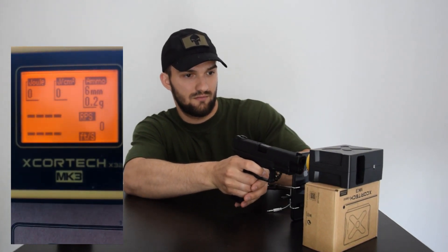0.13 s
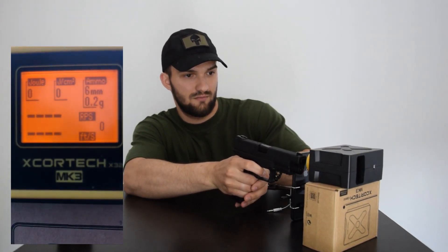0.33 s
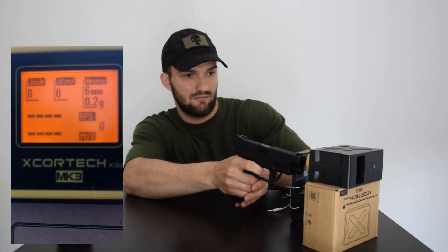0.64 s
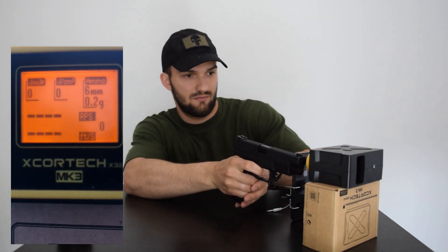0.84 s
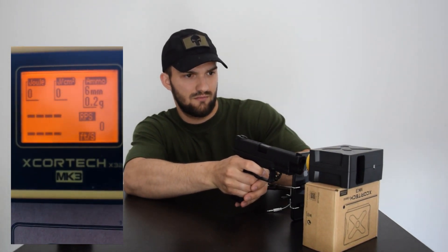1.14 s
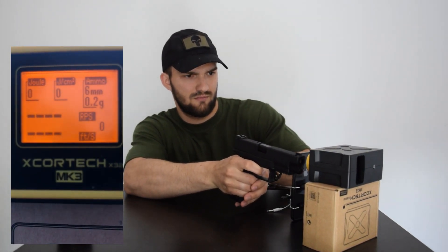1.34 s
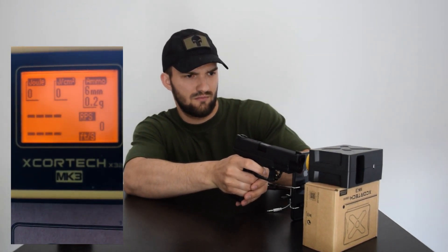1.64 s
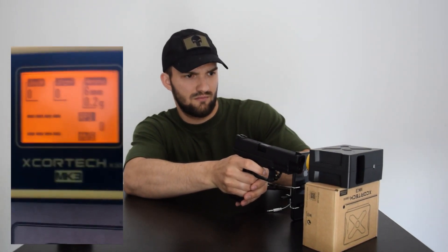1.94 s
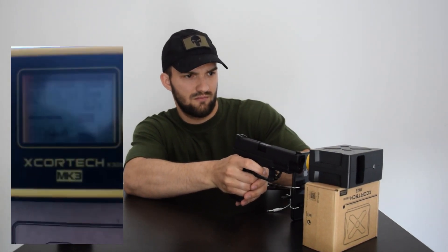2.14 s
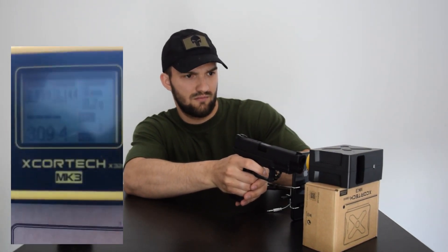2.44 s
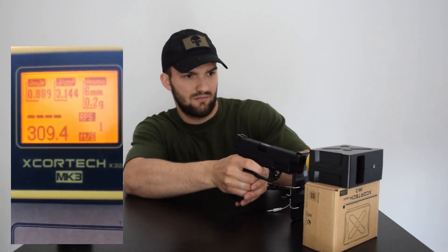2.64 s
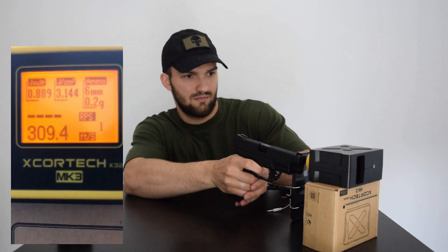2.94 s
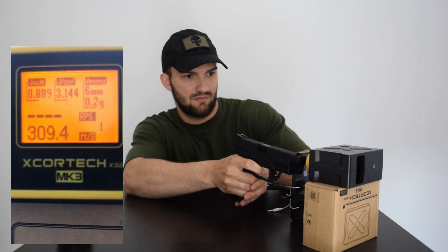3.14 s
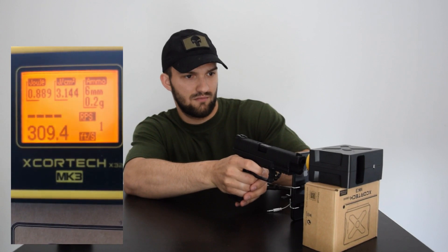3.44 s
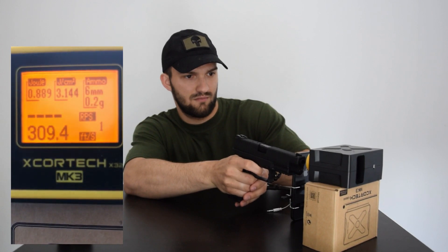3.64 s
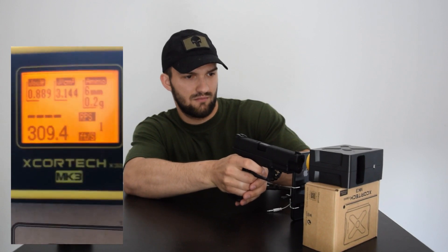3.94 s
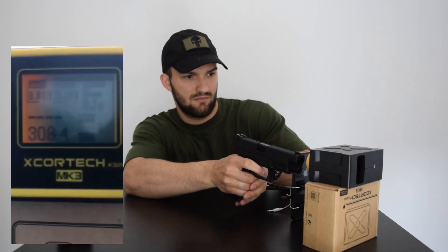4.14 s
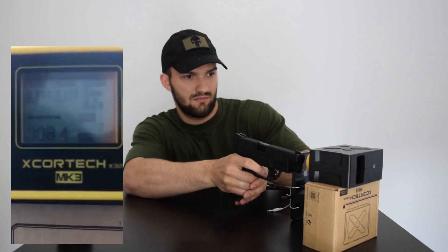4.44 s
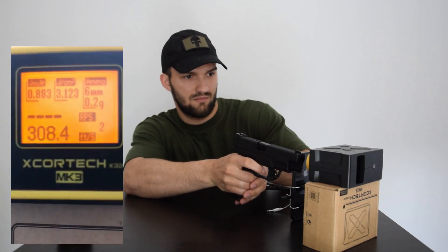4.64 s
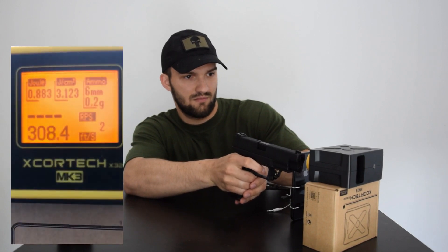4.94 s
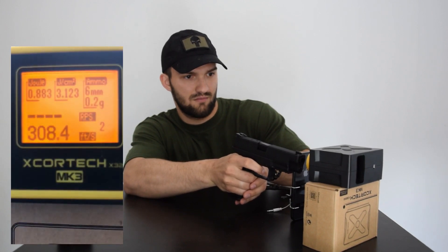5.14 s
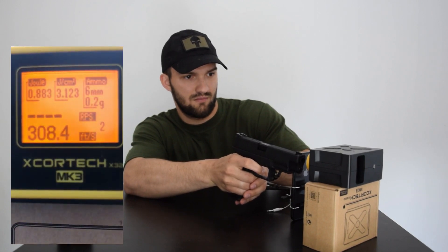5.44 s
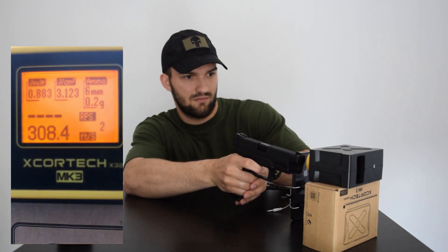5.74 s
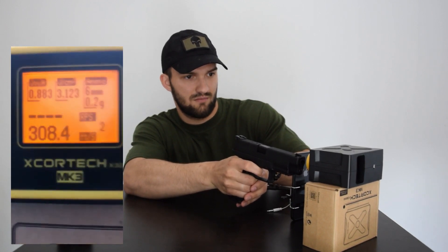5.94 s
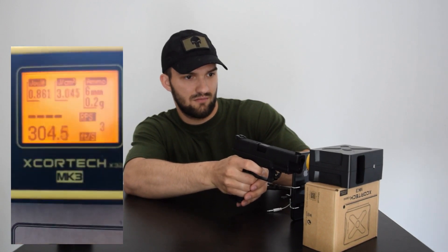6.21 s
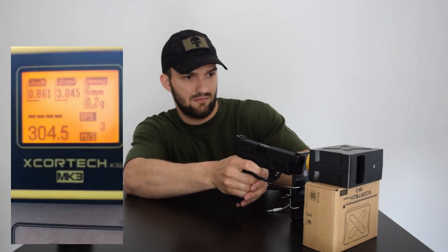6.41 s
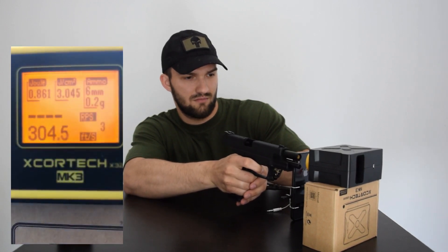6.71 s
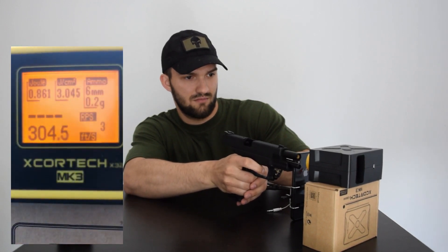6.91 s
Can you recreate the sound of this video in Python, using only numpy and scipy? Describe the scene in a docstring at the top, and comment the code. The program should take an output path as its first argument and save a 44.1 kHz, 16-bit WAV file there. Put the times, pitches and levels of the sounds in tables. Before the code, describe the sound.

A gas-powered pellet pistol fires three single loud snaps, slide clattering, room ringing briefly, with faint hiss and soft rumble between shots.

```python
"""A gas blowback airsoft pistol fires three shots through a chronograph on a table in a small, bare room.
Each shot is a hammer tick, a pressure pulse, a jet of gas and the clack of the slide, built from shaped noise,
clicks and decaying sines. The room answers with echoes, a dense tail and standing waves for most of a second.
The close microphone overloads on the loud onsets. Soft rumble, a faint hiss and a trace of whine fill the pauses."""
import sys
import numpy as np
from scipy import signal
from scipy.fft import rfft, irfft
from scipy.io import wavfile

SR = 44100
rng = np.random.default_rng(int(sys.argv[2]) if len(sys.argv) > 2 else 0)


def put_to_file(sound):
    """Save the sound as 16-bit audio at rate SR, in the file named by the first command-line argument."""
    columns = np.atleast_2d(sound).T  # one column per channel
    safe = np.clip(columns, -1, 1)
    whole_steps = np.round(safe * 32767)
    wavfile.write(sys.argv[1], SR, whole_steps.astype(np.int16))


N = 311787

# Room air at the microphone, spectral shape: (frequency [Hz], level [dB])
AIR_SPECTRUM = [(20, -8.5), (50, 0), (160, -1.5), (215, 4), (255, 2), (300, -3.5), (600, -6.5), (1100, -10),
                (1800, -14), (3300, -19), (5000, -20), (7000, -22), (8000, -27.5), (15500, -38)]
# Narrow resonances of the hiss: (centre [Hz], half-width at half gain [Hz], level [dB])
HISS_RESONANCES = [(1480, 110, -15), (2201, 180, -11.5), (2610, 90, -12.5), (2860, 150, -10.5),
                   (3520, 110, -14), (3790, 110, 0.5), (3920, 48, 0), (4050, 30, -1), (4332, 75, -3),
                   (4500, 100, -13), (5350, 150, -20), (5970, 110, -13.5), (6280, 170, -16),
                   (6960, 220, -16.5)]
AIR_DB, HISS_DB, WHINE_DB = -59.5, -59.5, -89
WHINE_HZ = 15682

# Shots: (time [s], pressure pulse level [dB], gas jet level [dB], slide level [dB],
# late clack time after the shot [s], late clack level [dB])
SHOTS = [(1.3730, -0.5, -2, -0.5, 0.11, -2.5), (3.7940, -1, 0.2, -1.5, 0.14, -3.5),
         (6.6084, -2.5, -2, -6, .136, -1)]
# Blows of the action, hammer, slide at its rear stop, slide home: (time after hammer fall [s], level [dB])
ACTION_BLOWS = [(0, -15), (.016, -1), (.058, -3)]
HAMMER_LEAD_S, BARREL_S = 0.0016, 0.003  # hammer falls before the gas; pellet's time in the barrel
# Metal-on-metal crack, spectral shape: (frequency [Hz], level [dB])
CLACK_SPECTRUM = [(100, -18), (400, -4.5), (1300, -2), (2000, -6), (3000, -2.5), (3800, -7), (6300, 3.5),
                  (7300, -4), (9000, -16), (15500, -36)]
# Ringing of slide and frame: (frequency [Hz], level [dB], 60 dB decay time [s])
GUN_MODES = [(1184, -5.5, 0.059), (1346, -1.5, 0.064), (2260, -8, .06), (2705, -1.5, 0.088),
             (2924, -3, 0.047), (3140, -2, 0.029), (4470, -5.5, 0.057), (5560, -5, .04), (6300, -2.5, .025),
             (6450, -4.5, .02)]
# Escaping gas, spectral shape: (frequency [Hz], level [dB])
JET_SPECTRUM = [(200, -25), (1000, -12.5), (2100, -12.5), (3100, -4.5), (3600, -10), (4500, -6), (5400, -4),
                (6400, -1.5), (7200, -4), (8200, -13.5), (10000, -22), (15500, -38)]
# Bright snap at the muzzle, spectral shape: (frequency [Hz], level [dB])
SNAP_SPECTRUM = [(1000, -14), (4000, -8), (6500, 0), (8500, -4), (12000, -3.5), (16000, -7)]
# Pressure pulse at the muzzle, spectral shape: (frequency [Hz], level [dB])
PULSE_SPECTRUM = [(30, -28), (90, -18), (190, -1.5), (235, -5), (300, 3), (440, 2.5), (530, -1),
                  (800, -1.5), (1300, -1), (1750, -7), (3000, -5.5), (4000, -11.5), (7000, -14),
                  (15000, -36)]

# Standing waves of the room: (frequency [Hz], level [dB], 60 dB decay time [s])
ROOM_MODES = [(165, -9, .6), (196.6, 2.5, .45), (306, 1, 0.42), (376, -2.5, .5), (419, -1, 0.7),
              (448.5, -3.5, 0.5), (603, -8.5, 0.64), (704, -8.5, .7), (915, -7, .5)]
# Room losses: walls take all pitches alike, panels take the bass, the air takes the treble
WALL_DB_PER_S, PANEL_DB_PER_S, AIR_DB_PER_S = 75.5, 50, 55
PANEL_REF_HZ, AIR_REF_HZ = 100, 10000  # where the panel and air losses have these values
TOP_HZ = 15850


def undb(db):
    """Decibels to amplitude gain."""
    return 10 ** (np.asarray(db) / 20)


def seconds(length):
    """Time axis of the given length in seconds."""
    return np.arange(int(length * SR)) / SR


def unit(x):
    """Scale to a total energy of one."""
    return x / np.sqrt(np.sum(x ** 2))


def on_log_axis(hz, points):
    """Read (Hz, value) points along a log-frequency axis."""
    at, value = np.transpose(points)
    return np.interp(np.log(np.maximum(hz, 1)), np.log(at), value)


def add(track, at, sound):
    """Mix a sound into the track at a time in seconds."""
    start = int(round(at * SR))
    part = sound[:len(track) - start]
    track[start:start + len(part)] += part


def fade(t, t60):
    """Exponential decay, 60 dB down after t60 seconds."""
    return np.exp(-np.log(1000) * t / t60)


def background():
    """Soft room rumble, a thin, steady hiss with narrow resonances, and a trace of electronic whine."""
    hz = np.fft.rfftfreq(N, 1 / SR)
    air_gain = undb(on_log_axis(hz, AIR_SPECTRUM))
    hiss_gain = sum(undb(db) / (1 + ((hz - centre) / width) ** 4) for centre, width, db in HISS_RESONANCES)
    air = unit(irfft(rfft(rng.standard_normal(N)) * air_gain, N))
    hiss = unit(irfft(rfft(rng.standard_normal(N)) * hiss_gain, N))
    whine = unit(np.sin(2 * np.pi * WHINE_HZ * np.arange(N) / SR))
    mix = undb(AIR_DB) * air + undb(HISS_DB) * hiss + undb(WHINE_DB) * whine
    return np.sqrt(N) * mix  # from unit energy to unit RMS


def click(points, size=4096):
    """Pulse that starts at once with the given spectrum: minimum phase, from the folded cepstrum."""
    hz = np.fft.rfftfreq(size, 1 / SR)
    cepstrum = irfft(np.log(undb(on_log_axis(hz, points))))
    cepstrum[1:size // 2] *= 2
    cepstrum[size // 2 + 1:] = 0
    return unit(irfft(np.exp(rfft(cepstrum))))


def burst(points, t60):
    """A dying burst of turbulent noise with an even, smooth spectrum."""
    t = seconds(0.4)
    half_fade = fade(t, 2 * t60)  # applied before and after flattening, together t60
    spectrum = rfft(rng.standard_normal(len(t)) * half_fade, 2 * len(t))
    flat = irfft(spectrum / np.abs(spectrum))[:len(t)]
    return unit(signal.fftconvolve(flat * half_fade, click(points)))


def ring(modes):
    """Resonances as decaying sines at random phase, their relative energies set by their levels."""
    t = seconds(1)
    total = 0
    for hz, db, t60 in modes:
        sine = np.sin(2 * np.pi * (hz * t + rng.random()))
        total = total + undb(db) * unit(fade(t, t60) * sine)
    return unit(total)


def metal_blow(crack_t60=0.016, ring_db=-7):
    """Metal meets metal: a short crack, while slide and frame ring."""
    sound = undb(ring_db) * ring(GUN_MODES)
    add(sound, 0, burst(CLACK_SPECTRUM, crack_t60))
    return sound


def pistol(crack_db=28.5, crack_t60=0.022, pulse_db=30.5, jet_db=30, action_db=20, jet_t60=0.13):
    """The hammer knocks the valve open with a crack; gas pops from the muzzle, hisses on, throws the slide back."""
    out = np.zeros(N)
    for at, pop_db, gas_db, slide_db, late_s, late_db in SHOTS:
        add(out, at, undb(crack_db + gas_db) * burst(JET_SPECTRUM, crack_t60))
        # the pressure pulse escapes once the pellet has left the barrel
        add(out, at + BARREL_S, undb(pulse_db + pop_db) * click(PULSE_SPECTRUM))
        add(out, at, undb(jet_db + gas_db) * burst(JET_SPECTRUM, jet_t60))
        for delay, db in ACTION_BLOWS:
            add(out, at - HAMMER_LEAD_S + delay, undb(action_db + slide_db + db) * metal_blow())
        add(out, at + late_s, undb(action_db + late_db) * metal_blow())
    return out


def muzzle_snap(snap_db=25, snap_t60=0.039):
    """The brightest part of each crack beams straight at the microphone, with no room reflections."""
    out = np.zeros(N)
    for at, _, gas_db, *_ in SHOTS:
        add(out, at, undb(snap_db + gas_db) * burst(SNAP_SPECTRUM, snap_t60))
    return out


def room_t60(hz):
    """Reverberation time: panel loss falls with the root of frequency, air loss grows with its square."""
    panel_loss = PANEL_DB_PER_S * np.sqrt(PANEL_REF_HZ / hz)
    air_loss = AIR_DB_PER_S * (hz / AIR_REF_HZ) ** 2
    return 60 / (WALL_DB_PER_S + panel_loss + air_loss)


def room(x, direct_db=-5, modes_db=-19.5, build_s=0.0019, early_db=-9, early_t60=0.09, count=24):
    """Direct sound, sparse first reflections, a dense tail whose top treble dies first, and standing waves."""
    t = seconds(1)
    hz = np.fft.rfftfreq(len(t), 1 / SR)
    scatter = np.exp(2j * np.pi * rng.random(len(hz)))
    centres = np.geomspace(40, SR / 2, count)
    tail = 0
    # overlapping triangular bands, each with its own decay
    for centre, share in zip(centres, np.eye(count)):
        band = irfft(scatter * on_log_axis(hz, np.c_[centres, share]), len(t))
        tail = tail + band * fade(t, room_t60(centre))
    # table and near walls return separate echoes, about 900 per second, before the field grows dense
    echoes = rng.standard_normal(len(t)) * (rng.random(len(t)) < 900 / SR)
    early = echoes * fade(t, early_t60)
    response = unit(tail) + undb(early_db) * unit(early) + undb(modes_db) * ring(ROOM_MODES)
    response *= 1 - np.exp(-t / build_s)
    response[0] += undb(direct_db)
    return signal.fftconvolve(x, response)[:N]


def scene():
    """The pistol in its room and its direct snap, over the background; one microphone."""
    return (room(pistol()) + muzzle_snap() + background())[None]


def gain_control(x, threshold=0.27, ratio=1.7, follow_s=0.022):
    """Turns loud sound down by its smoothed level, too slowly to catch the first crack."""
    keep = np.exp(-1 / (follow_s * SR))
    envelope = signal.lfilter([1 - keep], [1, -keep], np.abs(x))
    return x * np.maximum(envelope / threshold, 1) ** (1 / ratio - 1)


def record(dry, ceiling=0.62, knee=12.0, low_cut_hz=24):
    """Gain control, then an input that clips; its coupling lets the flat tops sag; the top is cut."""
    driven = gain_control(dry)
    clipped = driven / (1 + np.abs(driven / ceiling) ** knee) ** (1 / knee)
    coupling = signal.butter(1, low_cut_hz, "high", fs=SR, output="sos")
    coupled = signal.sosfilt(coupling, clipped)
    top_cut = signal.firwin(401, TOP_HZ, window="blackman", fs=SR)
    return signal.fftconvolve(coupled, top_cut[None], "same")


dry = scene()
out = record(dry)
put_to_file(out)
```